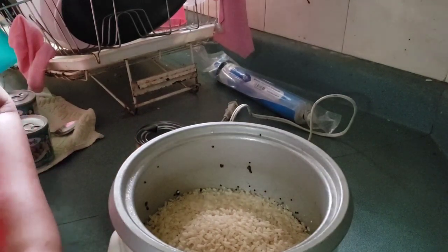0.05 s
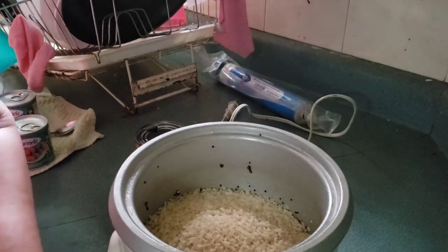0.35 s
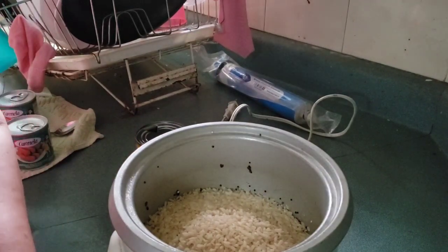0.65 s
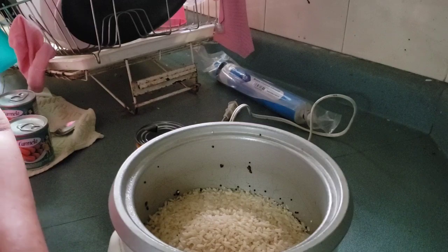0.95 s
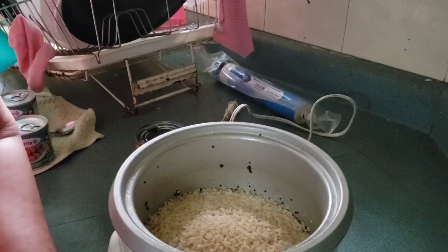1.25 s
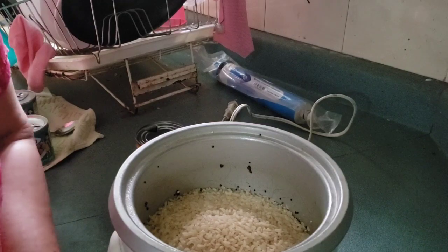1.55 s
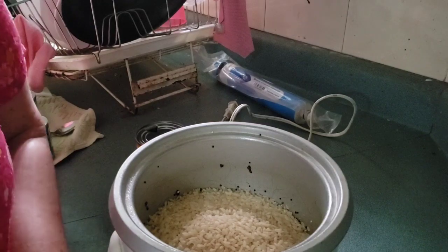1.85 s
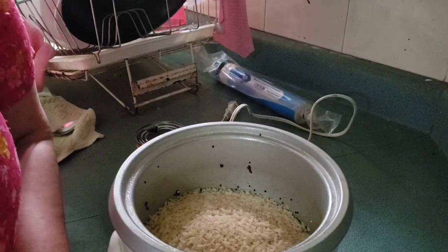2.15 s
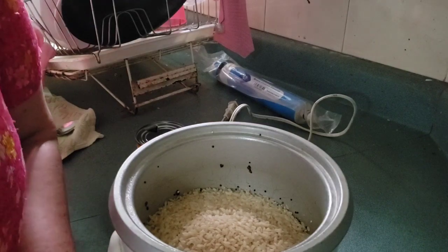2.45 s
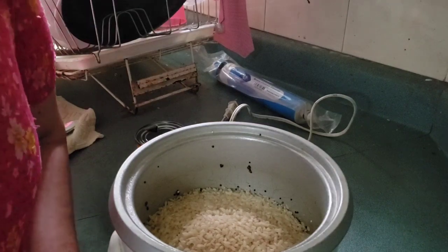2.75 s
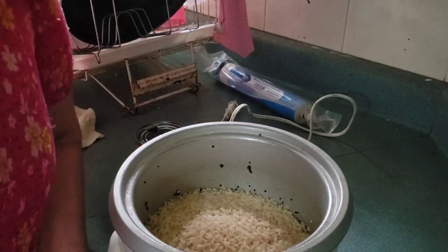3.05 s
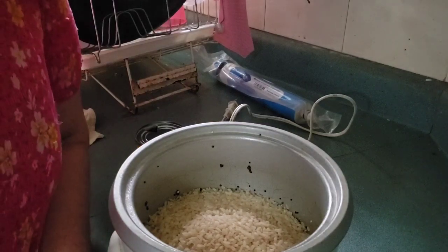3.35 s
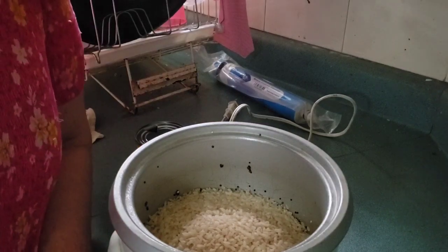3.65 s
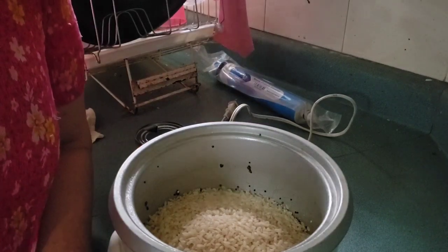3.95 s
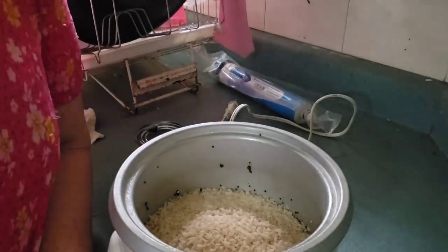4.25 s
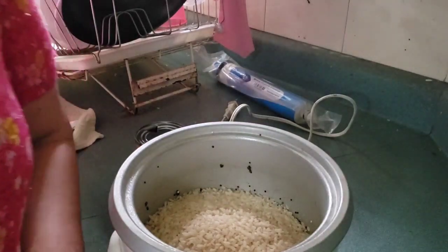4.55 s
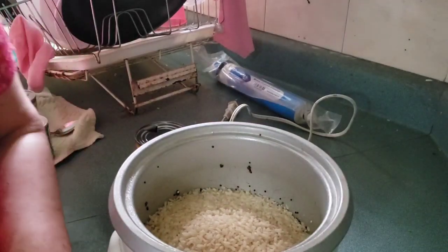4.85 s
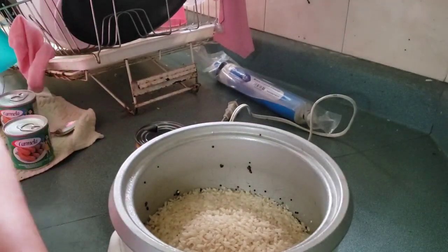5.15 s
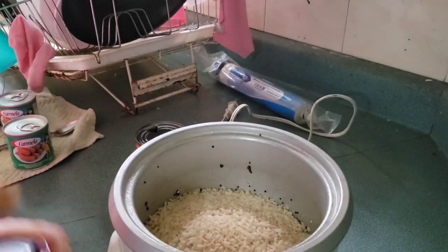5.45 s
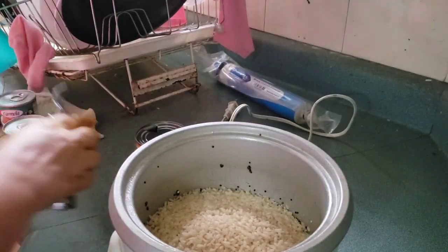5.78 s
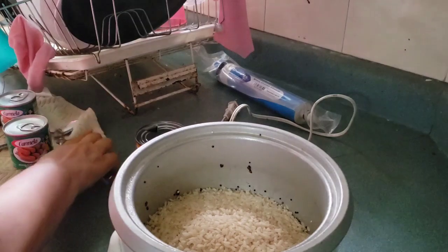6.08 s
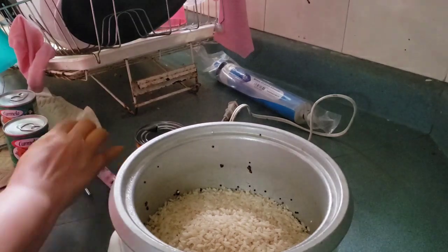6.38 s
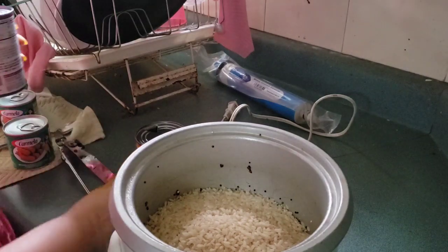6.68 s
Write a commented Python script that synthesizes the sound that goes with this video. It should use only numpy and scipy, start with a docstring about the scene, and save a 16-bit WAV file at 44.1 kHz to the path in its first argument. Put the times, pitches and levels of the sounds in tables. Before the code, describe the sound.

Over a steady low fan drone in a small tiled kitchen, a metal food can slides under the fingers and knocks on the counter, followed by light taps. A lid snaps loudly, then a hand can opener clicks and scratches briefly along a rim. A can is set down with two ringing knocks, and the opener clatters onto the counter. The handling is close and to the left of the microphone.

```python
"""Food cans on a kitchen counter

On the left, cans slide under the fingers and knock on the counter, so the tin rings and the top booms.
A metal lid snaps loudly. A can opener clicks, scratches along a rim and is put down with a clatter.
A fan drones all the while in the small tiled room. The recorder's automatic volume control
turns everything down after the snap, then creeps back up."""
import sys
import numpy as np
from scipy import signal
from scipy.fft import rfft, irfft, next_fast_len
from scipy.io import wavfile
from scipy.ndimage import uniform_filter1d, minimum_filter1d

SR = 44100
rng = np.random.default_rng(int(sys.argv[2]) if len(sys.argv) > 2 else 0)


def log_audio(samples):
    """Write samples as a 16-bit WAV file to the path given in sys.argv[1]."""
    # one column per channel
    frames = np.atleast_2d(samples).T
    # limit to full scale, then quantise
    limited = np.clip(frames, -1, 1)
    pcm = np.round(limited * 32767).astype(np.int16)
    wavfile.write(sys.argv[1], SR, pcm)


N = 300762

# A decay_s is the time a sound takes to fall by 60 dB. Brightness tilts the sound above 1 kHz.
# How long the tiled room echoes: frequency_hz, decay_s
ROOM_DECAY = [(100, 0.16), (300, 0.65), (900, 0.72), (3000, 0.76), (6000, 0.72), (9500, 0.53),
              (14000, 0.46)]
# How alike steady noise is at the two ears (1 is the same): frequency_hz, likeness
EAR_LIKENESS = [(60, 1), (180, 0.94), (550, 0.53), (1650, 0.13), (4970, -0.044), (15000, -0.052)]
# How much louder the left ear hears the counter, and the steady sounds: frequency_hz, extra_db
COUNTER_LEFT = [(100, -1), (200, -0.5), (400, 3.5), (800, 6), (2000, 7.5), (3500, 10), (5700, 13.5),
                (7200, 12), (8800, 3), (11000, 5.5), (14000, 7.5)]
STEADY_LEFT = [(90, -1.5), (200, -1.5), (450, 4.5), (1000, 6.5), (2000, 8.5), (3500, 14.5), (6000, 15.5),
               (8500, 9), (13000, 8.5)]
# Tone of the fan's drone, its moving air and the recorder's hiss: frequency_hz, level_db
DRONE_TONE = [(15, -48.5), (25, 0), (54, -13.5), (76, -4), (128, -1), (207, -11.5), (237, -11),
              (320, -12.5), (361, -2), (525, -11.5), (574, -16.5), (628, -11.5), (687, -17.5), (752, -21.5),
              (900, -22.5), (1170, -62.5), (1980, -120)]
AIR_TONE = [(500, -24.5), (800, 1), (1100, 0), (1420, -0.5), (1800, -1), (2080, -10), (2350, -6),
            (2700, -12), (3200, -17), (3500, -15.5), (3950, -26.5), (4800, -20.5), (6200, -26), (7600, -19),
            (8400, -33), (16000, -21)]
HISS_TONE = [(1000, -10), (7500, -9.5), (8500, -5), (11000, -0.5), (14000, -9), (15200, 10), (16000, 1)]
# The fan motor's hum: pitch_hz, level_db
MOTOR_NOTES = [(93, -54.5), (140, -50.5), (242, -58), (290, -60), (358, -53.5), (452, -54.5), (533, -56),
               (614, -58.5), (736, -55), (822, -66.5)]

# Tin slides under the fingers:
# fastest_s, rise_s, fall_s, level_db, brightness_db_per_octave, pitch_hz, hollow_note_db
SLIDES = [(.05, 0.17, 0.12, -52.5, 4.5, 1044, 13), (.16, 0.13, 0.21, -50.5, 2, 1070, 3),
          (.475, 0.27, 0.098, -43.5, 3, 1100, 4), (1.763, 0.093, 0.071, -42.5, -0.5, 2090, -7),
          (4.258, 0.091, 0.157, -38.5, 2, 752, 0), (4.478, 0.095, 0.07, -45.5, -2, 1584, 16)]
# The opener's cutter scratches the rim: fastest_s, rise_s, fall_s, level_db
SCRATCHES = [(4.25, 0.092, 0.091, -47), (4.33, 0.064, .05, -55)]
# Taps on a full can in the hand: start_s, level_db, pitch_hz, hollow_note_db, brightness_db_per_octave
TAPS = [(0.8, -46, 5100, 3, 3), (0.8583, -29, 1089, 11.5, -7), (1.752, -38, 1500, -11, -2.5),
        (1.762, -41.5, 1090, 2, -0.5), (1.773, -44, 603, 2, -4.5), (1.906, -45, 1050, 1, -3),
        (2.427, -49, 1100, -1, -9), (2.763, -42.5, 5370, -14.5, -0.5), (2.772, -48, 903, 5, -3),
        (3.741, -45.5, 1230, 14.5, 4), (4.2515, -30, 830, 7, 0.5), (4.259, -34, 654, 5, -9.5),
        (4.341, -34.5, 1120, -12, -7), (4.397, -38.5, 2070, -3, -1)]
# Light ticks of fingernails on tin: start_s, level_db, pitch_hz, decay_s
TICKS = [(0.0837, -40.5, 15000, .01), (0.5021, -34, 12500, 0.014), (0.7095, -45, 13000, .014),
         (0.9163, -50, 12000, .012), (1.1852, -48, 15500, .018), (1.445, -64, 8000, .04),
         (1.488, -59, 7500, 0.022), (2.641, -48.5, 10800, 0.025), (4.66, -55, 7500, 0.023),
         (4.8364, -52.5, 13000, .025), (5.0123, -38, 13500, .02), (5.2672, -37, 12000, .016)]
# Tone of a tick: multiple_of_pitch, level_db
TICK_TONE = [(.2, -26.5), (.55, -15), (.8, -6.5), (1, -2), (1.5, -6.5)]
# Tone of a slide, a scratch and a tap: frequency_hz, level_db
SLIDE_TONE = [(400, 3.5), (800, 7), (1700, 1), (3400, -15.5), (4100, -20.5), (6200, -21), (7100, -19.5),
              (8700, -22), (11500, -18), (13300, -18), (16000, -23)]
SCRATCH_TONE = [(2500, -24), (3300, 3), (4000, -3), (5000, -7), (6300, -7), (7100, -14), (8300, -15),
                (11500, -9), (12300, -1), (13000, -5), (16000, -17)]
TAP_TONE = [(200, -27.5), (600, -1.5), (1100, -2), (2000, -7.5), (3300, -8.5), (4500, -24), (8000, -34),
            (16000, -28)]
# Ringing of the held can's wall, and of the counter top: pitch_hz, level_db, decay_s
HELD_CAN_NOTES = [(650, -5, 0.12), (1494, -8.5, 0.035), (1684, -6, 0.052), (2250, -16.5, 0.083),
                  (3460, -18.5, 0.074), (5300, -34, 0.06)]
COUNTER_NOTES = [(70, -10.5, .13), (92.3, 2, .3), (103, -2, 0.21), (123.6, -1, 0.25), (162, -4.5, 0.25),
                 (227, -4.5, 0.18)]

# The opener's wheel clicks: start_s, level_db, brightness_db_per_octave
WHEEL_CLICKS = [(4.004, -28.5, -2.5), (4.015, -22.5, 0), (4.03, -22.5, 3), (4.042, -28, -2)]
# Its loose steel parts jingle: start_s, level_db
JINGLES = [(4.144, -54), (4.226, -49), (4.238, -45), (4.251, -35.5), (4.341, -50), (5.578, -51)]
# Its head lands, then its handles bounce: start_s, level_db, thump_db, brightness_db_per_octave
HEAD_HITS = [(6.032, -20, -47, 0), (6.0345, -10, -19, 1.5), (6.044, -16.5, -30, -10),
             (6.071, -24, -27, -2.5)]
HANDLE_HITS = [(6.1935, -14.5, -32, -0.2), (6.197, -24.5, -39, 3), (6.205, -19, -27.5, -11),
               (6.217, -20.5, -53, 2.5), (6.228, -19.5, -41, -2.5), (6.238, -24, -53, -7)]
# Tone of a hit on each part of the opener: frequency_hz, level_db
WHEEL_TONE = [(700, -27), (1400, 1), (2500, -7), (4500, -3.5), (7000, 0.5), (8500, 0.5), (12000, 8.5),
              (16000, -6)]
HEAD_TONE = [(160, -48), (280, -4), (600, -5), (1070, -24), (1350, -6.5), (1800, -0.5), (1960, -13),
             (2360, -5.5), (3400, -15), (5150, -28), (7220, -19), (8850, -21.5), (10500, -17), (11400, -15),
             (14000, -11), (16000, -21)]
HANDLE_TONE = [(160, -10), (280, -25), (337, 1.5), (420, -16), (570, -2.5), (747, -5.5), (947, -8),
               (1660, -8), (2440, -11), (2710, -9.5), (3500, -14.5), (6310, -30), (7600, -25.5),
               (11600, -23.5), (12600, -16.5), (16000, -26)]
# Ringing of each part of the opener: pitch_hz, level_db, decay_s
WHEEL_NOTES = [(1447, -18.5, 0.085), (5500, -13.5, 0.026), (7060, -10.5, 0.025), (10200, -9, 0.04),
               (12200, -22, 0.05)]
JINGLE_NOTES = [(3300, -5.5, 0.045), (5200, -11, .05), (7120, -3.5, 0.046), (8150, -8.5, 0.034),
                (9240, -13, 0.053), (10300, -6, .05), (12250, -7, 0.047), (13600, -8, .04)]
HEAD_NOTES = [(337, -12.5, 0.23), (469, -23.5, 1), (566, -9.5, 0.1), (748, -13, 0.096), (1590, -44, 0.23),
              (1660, -22, 0.18), (2040, -14, 0.08), (7500, -17.5, 0.053), (10300, -13, 0.076),
              (14400, -20, 0.09)]
HANDLE_NOTES = [(314.5, -17, 0.2), (590, -13.5, 0.07), (708, -22, 0.077), (826, -15.5, 0.091),
                (952, -19, 0.23), (1530, -18, .12), (1864, -11, 0.044), (2680, -16, 0.043),
                (3470, -22, 0.043), (12400, -30, 0.063)]

# The first can is knocked as it is picked up: start_s, level_db, thump_db
FIRST_CAN_HITS = [(0.7456, -10.5, -35), (0.7488, -16, -52), (0.756, -25, -34), (0.7638, -20, -42),
                  (0.8, -29, -32)]
# The second is set down edge by edge: start_s, level_db, thump_db, hollow_knock_db, wall_pitch_hz
SECOND_CAN_HITS = [(4.8858, -10, -17, -18, 5060), (4.8932, -20.5, -24.5, -19, 2220),
                   (5.1105, -8.5, -24, -21.5, 4070), (5.120, -28, -37, -21, 4780)]
# A can rocks on its rim: start_s, level_db, pitch_hz
ROCKING_KNOCKS = [(0.768, -23, 215), (0.7766, -21, 204), (0.84, -26, 171), (4.9145, -15, 185),
                  (4.943, -13.5, 125), (5.143, -16, 165), (5.168, -21, 126.3), (5.186, -25, 125)]
# The lid snaps and chatters: start_s, level_db, thump_db
LID_HITS = [(3.461, -1.5, -29), (3.4641, -15, -41.5), (3.470, -1.5, -43), (3.478, -7, -23),
            (3.49, -18, -41.5)]
# Tone of a hit on each can, the hollow top and the snapping lid: frequency_hz, level_db
FIRST_CAN_TONE = [(120, -38), (200, 0.5), (259, -50), (322, -23), (696, -14), (1080, -32), (1300, -34),
                  (1650, -21.5), (1980, -49), (3490, -34), (4200, -39), (4770, -41.5), (16000, -31.5)]
SECOND_CAN_TONE = [(130, -30.5), (250, -18.5), (550, -12.5), (960, -6), (1220, -13.5), (1500, 0.5),
                   (1760, -0.5), (2070, -17), (2600, -22), (3240, -24.5), (4300, -20.5), (5100, -16.5),
                   (5750, -14.5), (6530, -22), (7700, -14.5), (8600, -26.5), (12400, -13), (16000, -19.5)]
KNOCK_TONE = [(100, -13.5), (210, -3), (330, -14.5), (550, -4), (800, -9), (1100, -17.5), (2500, -36)]
LID_TONE = [(120, -29.5), (200, -5), (480, -12.5), (680, -15.5), (950, -2), (1120, -7.5), (1550, -5.5),
            (2400, -6.5), (3250, -1), (3700, -5), (4050, -15), (5450, -9), (6200, -13), (7300, -9.5),
            (8500, -14), (10000, -5), (14600, -14), (16000, -27.5)]
# Ringing of each can and the snapping lid: pitch_hz, level_db, decay_s
FIRST_CAN_NOTES = [(223.7, -20.5, 0.37), (606, -24, 0.1), (698, -25, 0.13), (1079, -23, 0.15),
                   (1643, -25.5, 0.06), (3542, -19.5, 0.044), (4780, -27.5, 0.08), (5420, -29, .05),
                   (6300, -33, 0.06), (9300, -41, 0.037), (10550, -16.5, .025)]
SECOND_CAN_NOTES = [(530.4, -21.5, 0.252), (795, -11, 0.12), (975, -11, 0.097), (1550, -13, 0.0331),
                    (1620, -13, 0.02), (2260, -23, 0.16), (5060, -35.5, 0.06), (5730, -13, 0.0246),
                    (6950, -31, 0.061), (7900, -17.5, 0.034), (10500, -16, .04)]
LID_NOTES = [(238, -25, 0.14), (404, -17.5, 0.069), (978, -16.5, 0.059), (1536, -25, 0.22),
             (1680, -27.5, 0.066), (2370, -32.5, 0.17), (2983, -29.5, 0.16), (3220, -23, .29),
             (3365, -19, 0.12), (3770, -27.5, 0.25), (4770, -33, 0.22), (5500, -16.5, 0.08),
             (5400, -31.5, .38), (6550, -30, .12), (7200, -31, .12), (9350, -29, 0.16)]
# The ping of each can's lid, heard with no room echo: pitch_hz, level_db, decay_s
FIRST_CAN_PING = [(3540, -18, 0.11)]
SECOND_CAN_PING = [(5740, -5, 0.025), (5590, -21.5, .14), (5770, -28.5, .36)]

DRONE_DB, AIR_DB, HISS_DB = -45, -60, -76
SLIPS_PER_S, SLIDE_HOLLOW_DB = 380, -5.5  # tiny catches of tin; their ring next to the rubbing
CEILING_DB, HOLD_S, RECOVER_DB_PER_S = -21.5, 2.13, 8  # volume control: limit, wait, climb back
START_GAIN_DB, START_HOLD_S = -7.5, 0.61  # the volume starts turned down for this long
MONO_BELOW_HZ, BOTTOM_HZ, TOP_HZ = 290, 34, 16100
SIDES = np.array([[.5], [-.5]])  # shares a difference between the left and right ear


def amp(db):
    """Turn decibels into a number to multiply by."""
    return 10 ** (np.asarray(db) / 20)


def unit(x):
    """Scale a sound to an average power of 1."""
    return x / np.sqrt(np.mean(x ** 2) + 1e-20)


def along(points, hz):
    """Read between the rows of a (frequency, value) table, on a musical pitch scale."""
    frequencies, values = np.transpose(points)
    return np.interp(np.log(hz + 1), np.log(frequencies + 1), values)


def wobble(turns_per_s):
    """A smooth random curve."""
    return signal.resample(rng.standard_normal(int(N * turns_per_s / SR) + 4), next_fast_len(N))[:N]


def fade(t, decay_s):
    """A fade that loses 60 dB in decay_s."""
    return amp(-60 * t / decay_s)


def tilt(hz, bright_db):
    """A slope of bright_db for each octave above 1 kHz."""
    return bright_db * np.log2(np.maximum(hz / 1000, 1))


def filtered(x, response):
    """Multiply each frequency in x by response(hz)."""
    size = next_fast_len(N + SR // 2)
    return irfft(rfft(x, size) * response(np.fft.rfftfreq(size, 1 / SR)), size)[..., :N]


def add(track, start_s, x):
    """Mix x into the track at start_s."""
    part = track[:, round(start_s * SR):][:, :x.shape[-1]]
    part += x[..., :part.shape[1]]


def rush(tone):
    """Steady stereo noise, nearly the same at both ears in the bass."""
    def response(hz):
        spread = np.arccos(np.clip(along(EAR_LIKENESS, hz), 0, 1)) / 2
        return amp(along(tone, hz)) * [np.cos(spread), np.sin(spread)]
    middle, side = filtered(rng.standard_normal((2, N)), response)
    return unit(np.array([middle + side, middle - side]))


def coloured(x, tone, bright_db, size=2048):
    """Give a hit its tone without smearing any sound ahead of it."""
    hz = np.fft.rfftfreq(size, 1 / SR)
    gain = amp(along(tone, hz) + tilt(hz, bright_db))
    cepstrum = irfft(np.log(np.maximum(gain, 1e-6)))
    cepstrum[1:size // 2] *= 2  # folding this in half makes the filter answer as early as it can
    cepstrum[size // 2 + 1:] = 0
    kernel = irfft(np.exp(rfft(cepstrum)))
    return signal.fftconvolve(x, kernel[None] / np.linalg.norm(kernel), axes=1)[:, :x.shape[1]]


def burst(t, decay_s):
    """Dying noise that, like a hard blow, is equally strong from low to high."""
    spectrum = rfft(rng.standard_normal(len(t)) * fade(t, decay_s))
    strength = np.sqrt(uniform_filter1d(np.abs(spectrum) ** 2, size=90) + 1e-12)
    even = irfft(spectrum / strength, len(t)) * fade(t, 10 * decay_s)
    return unit(even) * np.sqrt(np.mean(fade(t, decay_s) ** 2))


def hit(tone, crack_s, scatter_db, scatter_s, bright_db=0):
    """A sharp crack, then its scatter off the pot, rack and wall, different at each ear."""
    t = np.arange(SR // 2) / SR
    scatter = amp(scatter_db) * rng.standard_normal((2, len(t)))
    scatter *= fade(t, scatter_s) * (1 - np.exp(-t / 0.00086))
    return coloured(burst(t, crack_s) + scatter, tone, bright_db)


def ring(notes, split, count=7):
    """Each note of the metal rings as a bunch of close pitches: a can is never quite round."""
    t = np.arange(SR // 2) / SR
    out = np.zeros((2, len(t)))
    for hz, db, decay_s in notes:
        detune = 1 + split * rng.uniform(-1, 1, (count, 1))
        phase = rng.uniform(0, 2 * np.pi, (count, 1)) + rng.normal(0, 0.76, (2, count, 1))
        decay = fade(t, decay_s)
        bunch = np.sin(2 * np.pi * hz * detune * t + phase).sum(1) * decay
        out += amp(db + rng.normal()) * unit(bunch) * np.sqrt(np.mean(decay ** 2) / 2)
    return out * (1 - np.exp(-t / 0.00053))


def in_kitchen(x, room_db, pan_db):
    """Shift a sound left by pan_db and add its echo from the tiled walls."""
    hz, t, noise = signal.stft(rng.standard_normal((2, SR * 3 // 4)), SR, nperseg=256)
    dying = noise * fade(t, along(ROOM_DECAY, hz)[:, None]) * (1 - np.exp(-t / 0.00089))
    echo = signal.istft(dying, SR, nperseg=256)[1]
    out = signal.fftconvolve(x[:1], echo / np.linalg.norm(echo[0]), axes=1) * amp(room_db - 2 * SIDES)
    out[:, :x.shape[1]] += x * amp(pan_db * SIDES)
    return out


def from_left(x):
    """Both ears share the bass; the left one hears the counter earlier and, higher up, louder."""
    x = x - filtered(x - x.mean(0), lambda hz: 1 / (1 + (hz / MONO_BELOW_HZ) ** 2))
    lead_s = SIDES * 6 / SR
    return filtered(x, lambda hz: amp(SIDES * along(COUNTER_LEFT, hz)) * np.exp(2j * np.pi * hz * lead_s))


def lean_left(x):
    """Above the bass, steady sound is louder at the left ear."""
    return filtered(x, lambda hz: amp(SIDES * along(STEADY_LEFT, hz)))


def fan():
    """A low drone with a wavering motor hum and gently swelling air."""
    t = np.arange(N) / SR
    hum = np.zeros((2, N))
    for hz, db in MOTOR_NOTES:
        level = amp(db + 1.4 * wobble(4.1))
        hum += level * np.sin(2 * np.pi * hz * t + 0.66 * wobble(7) + rng.normal(0, 0.52, (2, 1)))
    drone = amp(DRONE_DB) * rush(DRONE_TONE)
    air = amp(AIR_DB + 0.97 * wobble(15)) * rush(AIR_TONE)
    return lean_left(drone + hum + air)


def held_can(hz, hollow_db, bright_db):
    """A can in the hand answers with a ringing wall and a hollow note that the grip tunes."""
    wall = [(pitch, db + tilt(pitch, bright_db), decay_s) for pitch, db, decay_s in HELD_CAN_NOTES]
    return ring(wall, split=0.02) + ring([(hz, hollow_db, .048)], split=0.014)


def stroke(grain, fastest_s, rise_s, fall_s, db):
    """A rubbing sound swells to its fastest moment and dies away."""
    t = np.arange(N) / SR - fastest_s
    away = np.maximum(-t / rise_s, t / fall_s)  # 0 at the peak, 1 at either end
    return grain * amp(db - 28 * away) * np.clip(2 - 2 * away ** 2, 0, 1)


def slides():
    """Sliding tin catches and slips, which rings the can; the cutter's scratch is thinner and grittier."""
    grain = rush(SLIDE_TONE) * amp(1.4 * wobble(250))
    grit = unit(rush(SCRATCH_TONE) * amp(5.3 * wobble(180)))
    slips = (rng.random(N) < SLIPS_PER_S / SR) * rng.standard_normal(N)
    out = sum(stroke(grit, *scratch) for scratch in SCRATCHES)
    for fastest_s, rise_s, fall_s, db, bright_db, pitch_hz, hollow_db in SLIDES:
        rub = unit(filtered(grain, lambda hz: amp(tilt(hz, bright_db))))
        can = held_can(pitch_hz, hollow_db, bright_db)
        hollow = unit(signal.oaconvolve(slips[None], can, axes=1)[:, :N])
        out += stroke(unit(rub + amp(SLIDE_HOLLOW_DB) * hollow), fastest_s, rise_s, fall_s, db)
    return in_kitchen(out, room_db=-8.5, pan_db=0.5)[:, :N]


def fingers():
    """The hand muffles the can, so fingers make only short hollow taps and tiny soft ticks."""
    out = np.zeros((2, N))
    for start_s, db, hz, hollow_db, bright_db in TAPS:
        tap = hit(TAP_TONE, crack_s=0.012, scatter_db=-12.5, scatter_s=0.17, bright_db=bright_db)
        tap += held_can(hz, hollow_db, bright_db)
        add(out, start_s, in_kitchen(amp(db) * tap, room_db=-14, pan_db=5))
    for start_s, db, hz, decay_s in TICKS:
        tone = [(hz * multiple, level) for multiple, level in TICK_TONE]
        tick = hit(tone, crack_s=decay_s, scatter_db=-7, scatter_s=0.074)
        add(out, start_s, in_kitchen(amp(db) * tick, room_db=-7, pan_db=6.5))
    return out


def thump(sway_db, push_hz):
    """The counter booms most near push_hz (lower for a heavier blow); the cabinet sways below it."""
    t = np.arange(SR // 2) / SR
    notes = [(hz, db - 20 * np.log10(1 + (hz / push_hz - push_hz / hz) ** 2), decay_s)
             for hz, db, decay_s in COUNTER_NOTES]
    boom = np.zeros(len(t))
    for hz, db, decay_s in notes + [(42.5, sway_db, 0.55)]:
        level = amp(db + rng.normal())
        pitch_hz = hz * (1 + 0.012 * rng.normal())
        boom += level * np.sin(2 * np.pi * pitch_hz * t) * fade(t, decay_s)
    return boom * (1 - np.exp(-t / 0.004))


def opener():
    """The wheel clicks round and loose parts jingle; later the whole tool clatters onto the counter."""
    out = np.zeros((2, N))
    for start_s, db, bright_db in WHEEL_CLICKS:
        click = hit(WHEEL_TONE, crack_s=0.0075, scatter_db=-8, scatter_s=0.089, bright_db=bright_db)
        click += ring(WHEEL_NOTES, split=0.048)
        add(out, start_s, in_kitchen(amp(db) * click, room_db=-14, pan_db=1))
    for start_s, db in JINGLES:
        add(out, start_s, in_kitchen(amp(db) * ring(JINGLE_NOTES, split=0.0157), room_db=-7.5, pan_db=2))
    for hits, tone, notes in (HEAD_HITS, HEAD_TONE, HEAD_NOTES), (HANDLE_HITS, HANDLE_TONE, HANDLE_NOTES):
        for start_s, db, thump_db, bright_db in hits:
            steel = hit(tone, crack_s=0.0036, scatter_db=-5, scatter_s=0.087, bright_db=bright_db)
            steel += ring(notes, split=0.0206)
            add(out, start_s, in_kitchen(amp(db) * steel, room_db=-9.5, pan_db=-0.5))
            add(out, start_s, amp(thump_db) * thump(sway_db=-5, push_hz=97))
    return out


def dull_knock(hz):
    """A blunt push on the counter top that dies within a few swings."""
    t = np.arange(SR // 4) / SR
    return np.sin(2 * np.pi * hz * t) * fade(t, 0.041) * (1 - np.exp(-t / 0.0029))


def cans():
    """Full cans knock and rock on the counter: rims clink, walls ring, lids ping and the top booms."""
    out = np.zeros((2, N))
    for start_s, db, thump_db in FIRST_CAN_HITS:
        tin = hit(FIRST_CAN_TONE, crack_s=0.0038, scatter_db=-10, scatter_s=0.078)
        tin += ring(FIRST_CAN_NOTES, split=0.027)
        add(out, start_s, in_kitchen(amp(db) * tin, room_db=-9.5, pan_db=2))
        add(out, start_s, amp(db) * ring(FIRST_CAN_PING, split=0.024))
        add(out, start_s, amp(thump_db) * thump(sway_db=-16, push_hz=139))
    for start_s, db, thump_db, knock_db, wall_hz in SECOND_CAN_HITS:
        tin = hit(SECOND_CAN_TONE, crack_s=0.012, scatter_db=-4, scatter_s=0.071)
        tin += ring(SECOND_CAN_NOTES + [(wall_hz, -28, .13)], split=0.033)
        knock = hit(KNOCK_TONE, crack_s=0.041, scatter_db=-4.5, scatter_s=0.29)
        add(out, start_s, in_kitchen(amp(db) * tin + amp(knock_db) * knock, room_db=-14, pan_db=0.5))
        add(out, start_s, amp(db) * ring(SECOND_CAN_PING, split=0.0127))
        add(out, start_s, amp(thump_db) * thump(sway_db=-22.5, push_hz=153))
    for start_s, db, hz in ROCKING_KNOCKS:
        add(out, start_s, amp(db) * dull_knock(hz))
    return out


def lid():
    """The lid lets go all at once and chatters against the rim."""
    out = np.zeros((2, N))
    for start_s, db, thump_db in LID_HITS:
        tin = hit(LID_TONE, crack_s=0.0074, scatter_db=-10.5, scatter_s=0.17)
        tin += ring(LID_NOTES, split=0.019, count=16)
        add(out, start_s, in_kitchen(amp(db) * tin, room_db=-7, pan_db=-0.5))
        add(out, start_s, amp(thump_db) * thump(sway_db=0.5, push_hz=88))
    return out


def scene():
    """Everything at the counter, heard over the fan."""
    return from_left(cans() + lid() + opener() + fingers() + slides()) + fan()


def volume_control(x):
    """A loud sound pushes the volume down at once; it waits, then climbs back at a steady rate."""
    t = np.arange(N) / SR
    level_db = 10 * np.log10(np.abs(uniform_filter1d(x.mean(0) ** 2, size=SR // 25)) + 1e-12)
    hold = round(HOLD_S * SR)
    held_db = minimum_filter1d(CEILING_DB - level_db, hold, origin=(hold - 1) // 2, mode="nearest")
    allowed_db = np.minimum(held_db, np.where(t < START_HOLD_S, START_GAIN_DB, 0))
    climb_db = RECOVER_DB_PER_S * t
    gain_db = np.minimum.accumulate(allowed_db - climb_db) + climb_db
    return x * amp(uniform_filter1d(gain_db, size=SR // 200))


def record(dry):
    """The recorder sets its volume, hisses faintly, clips peaks and cuts the lowest and highest sounds."""
    def band(hz):
        bass_cut = hz ** 10 / (hz ** 10 + BOTTOM_HZ ** 10)
        return bass_cut * np.clip((TOP_HZ + 200 - hz) / 400, 0, 1)
    hiss = amp(HISS_DB) * lean_left(rush(HISS_TONE))
    return filtered(np.clip(volume_control(dry) + hiss, -1, 1), band)


dry = scene()
out = record(dry)
log_audio(out)
```